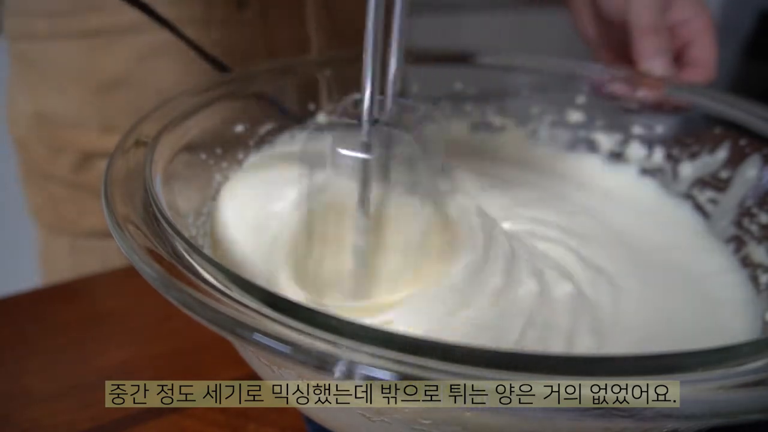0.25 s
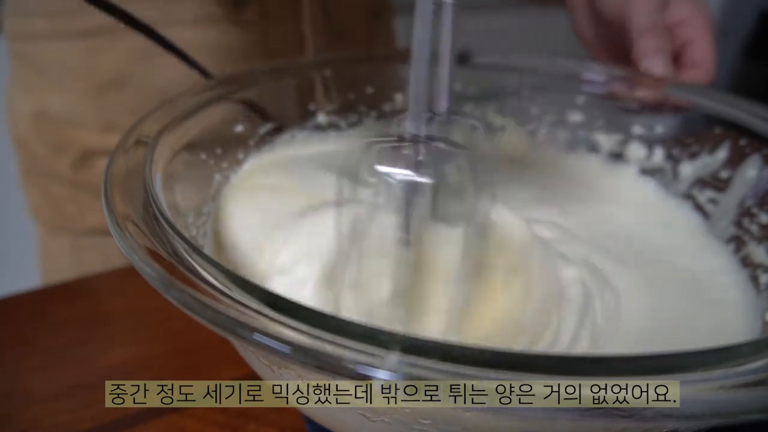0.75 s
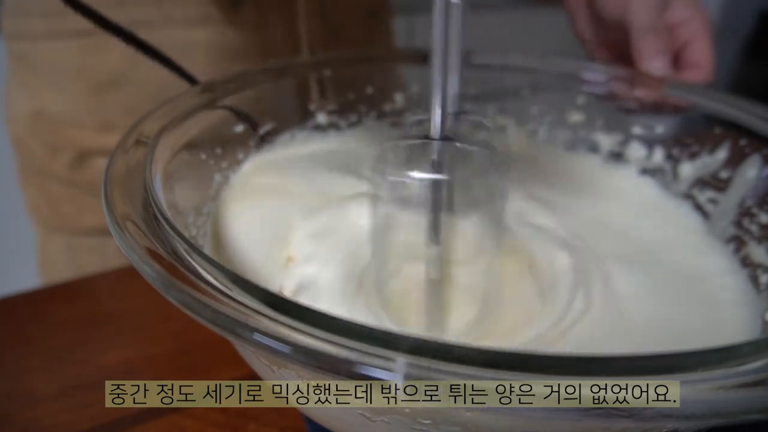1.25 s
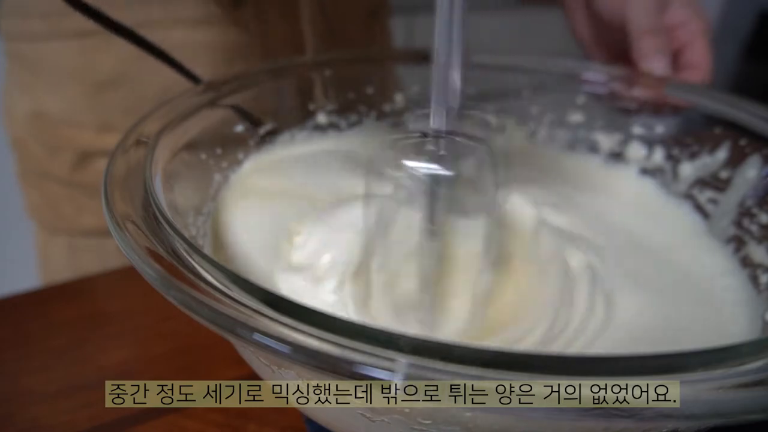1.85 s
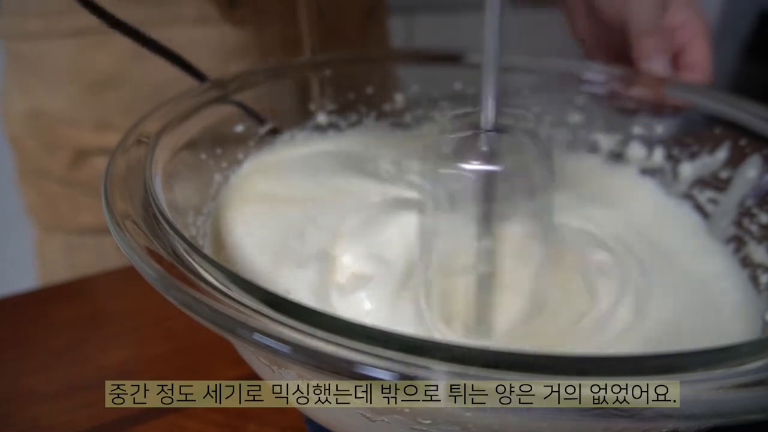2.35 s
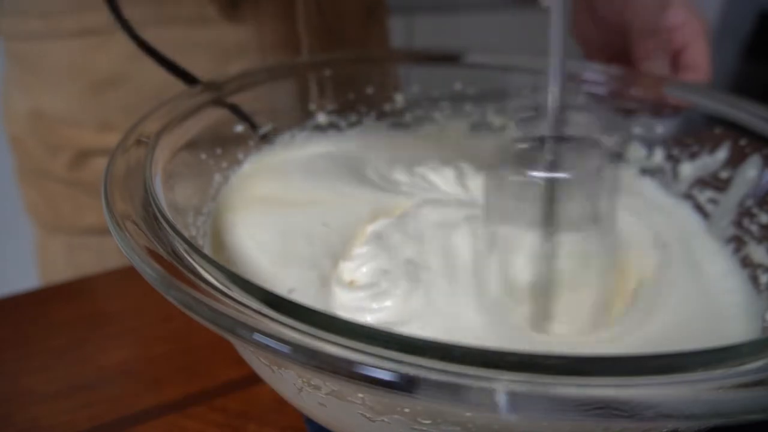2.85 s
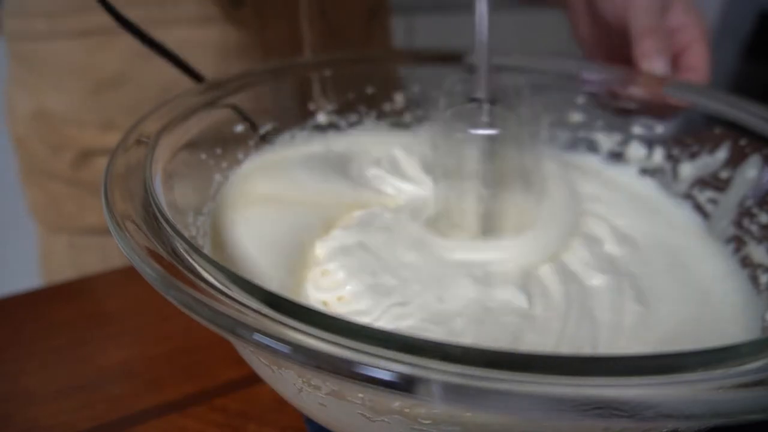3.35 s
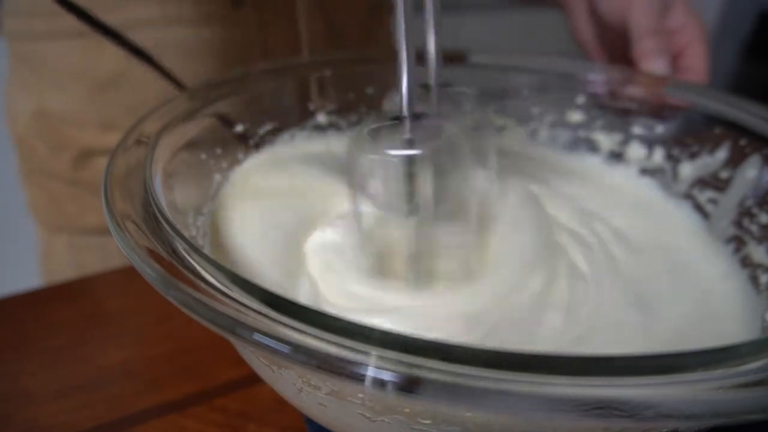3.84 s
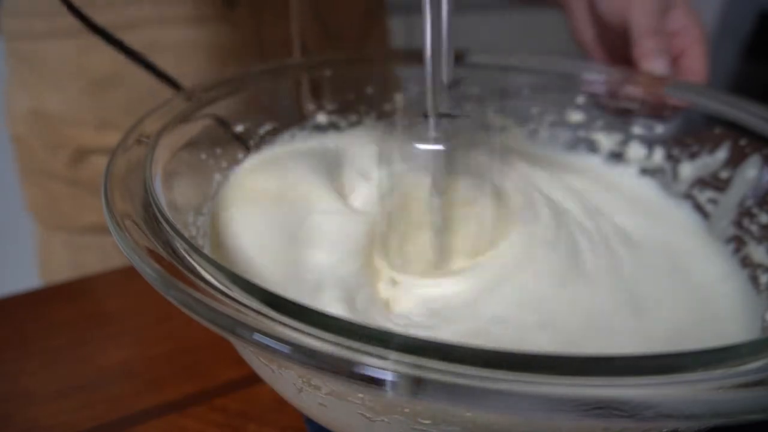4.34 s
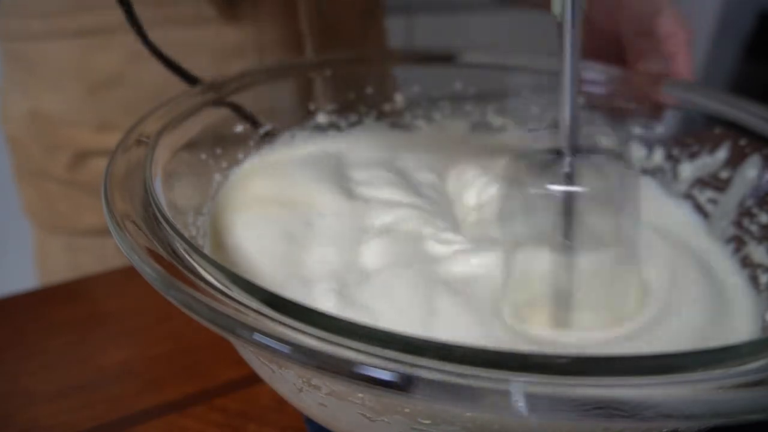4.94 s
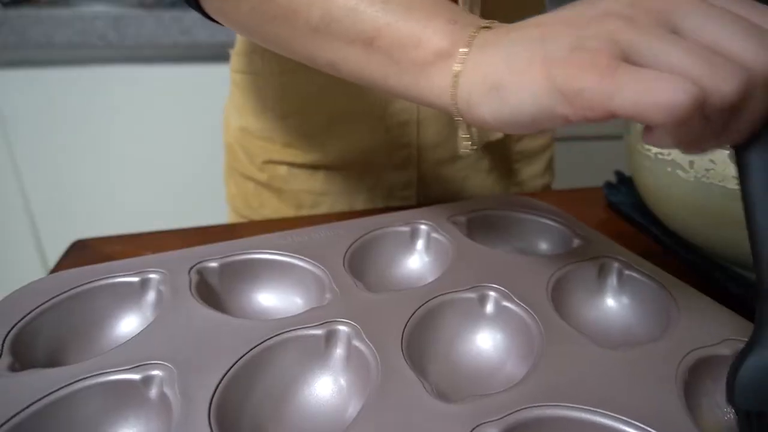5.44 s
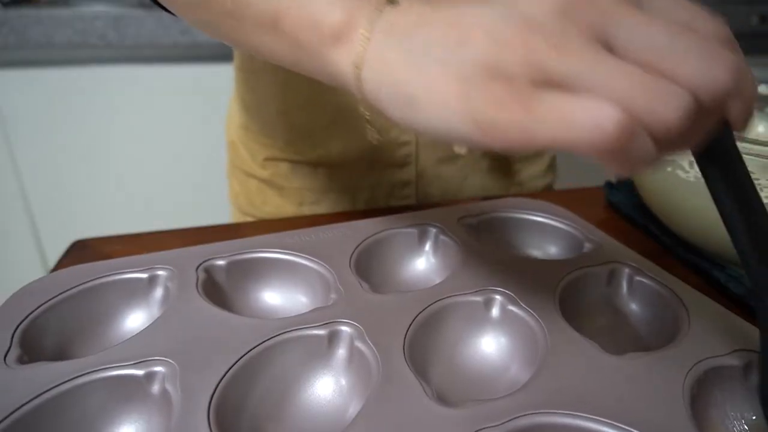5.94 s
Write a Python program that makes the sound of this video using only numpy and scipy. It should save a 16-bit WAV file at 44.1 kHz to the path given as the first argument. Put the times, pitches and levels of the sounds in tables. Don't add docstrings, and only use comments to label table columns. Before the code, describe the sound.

Close microphone on an electric mixer: a constant mid-pitched whine with bright overtones, gear rasp and broad airy hiss, gently wavering and shifting slightly left and right. An abrupt edit switches to a much quieter home kitchen, where a fridge hums low, a ladle rubs a glass bowl in two firm drags and fainter touches, and faint clicks and taps are heard.

```python
import sys
import numpy as np
from scipy import signal
from scipy.fft import rfft, irfft, next_fast_len
from scipy.io import wavfile
from scipy.ndimage import uniform_filter1d

SR = 44100
rng = np.random.default_rng(int(sys.argv[2]) if len(sys.argv) > 2 else 0)


def voltage_ratio(level):
    return 10 ** (np.asarray(level, float) / 20)


def unload_audio(sound):
    columns = np.transpose(np.atleast_2d(sound))
    steps = np.round(np.clip(columns, -1, 1) * 32767)
    wavfile.write(sys.argv[1], SR, steps.astype(np.int16))


N = 272959

CUT_S = 5.2205
MAINS_HZ = 120

# f/Hz, density/dB per Hz
ROOM_COLOUR = [(22, -6), (40, -16), (70, -5.5), (150, -8.5), (300, -10), (600, -16.5), (1000, -27.5),
               (2000, -32), (4000, -37.5), (8000, -41.5), (16000, -48)]
# f/Hz, side over mid/dB
ROOM_SIDE = [(60, -39), (110, -22), (200, -18), (380, -15), (700, -9), (1290, -5.5), (2380, 0), (4400, 0),
             (8120, -1), (15000, -2)]
# f/Hz, width/Hz, level/dB
DRONES = [(27, 10, -59), (153, 10, -54), (237, 12, -56), (297, 12, -58), (400, 40, -59)]
# t/s, peak level/dB, low edge f/Hz, high edge f/Hz, time to fall 60 dB/s
TICKS = [
    (5.3212, -50, 1500, 5000, .01),
    (5.3531, -44, 6200, 8300, .008),
    (5.49, -51, 4000, 13000, .08),
    (5.604, -36.5, 2000, 8500, .004),
    (5.6779, -46, 1500, 6500, .07),
    (5.679, -52, 1680, 1860, .12),
    (5.862, -50, 5000, 15500, .03),
    (5.872, -49, 4000, 10000, .07),
]
# f/Hz, width/Hz, level/dB
BOWL = [(393, 60, 4), (540, 110, 1), (720, 140, -3), (1040, 150, -7), (1330, 160, -4), (1780, 300, -24)]
# start t/s, length/s, level/dB
STROKES = [
    (5.24, 0.067, -55),
    (5.336, 0.13, -43),
    (5.5, 0.027, -54),
    (5.679, .02, -48),
    (5.757, 0.036, -50),
    (5.833, 0.11, -44.5),
]
# t/s, side (positive = left), reach across the bowl, lift out of the batter (all about -1..1)
HAND = [(0.0, -0.12, 0.01, -0.6), (0.23, 0.49, -0.82, -0.15), (0.55, -0.34, 0.44, -1),
        (0.82, 0.12, -0.56, 0.22), (1.09, -0.0073, 0.31, 0.15), (1.35, 0.22, -0.68, 0.29),
        (1.63, -0.053, 0.35, -0.52), (1.88, -0.098, -0.33, 0.03), (2.09, 0.28, 0.19, -1.07),
        (2.27, -1, -0.0094, 0.8), (2.5, 0.4, -0.2, -0.19), (2.93, -0.83, 0.19, 0.6),
        (3.07, 0.48, -0.36, -0.11), (3.38, -0.14, 0.16, -0.55), (3.61, 0.22, -0.36, -1.1),
        (4.13, 0.66, 0.11, 1.0), (4.99, -0.57, 0.28, 0.29), (5.22, -0.089, 0.41, -0.2)]
# f/Hz, side over mid/dB
MIXER_SIDE = [(25, -45), (60, -41), (110, -23), (200, -30), (380, -28.5), (700, -16.5), (1290, -13),
              (2380, -15), (4400, -10.5), (8120, -5.5), (15000, -1)]
# f/Hz, left over right/dB
MIXER_LEAN = [(60, 1), (110, 0.5), (200, 1), (380, -0.8), (700, 0.0), (1290, 0.9), (2380, -3), (4400, -1.8),
              (8120, -1.5), (15000, -1.2)]
# f/Hz, density/dB per Hz
AIR_COLOUR = [(25, -24), (50, -33), (110, -14.5), (190, -8), (300, 0), (600, -2), (1050, -5.5), (1250, -2),
              (2000, -1.5), (2900, -2.5), (4300, -4.5), (7000, -8.5), (10000, -10.5), (13000, -16.5),
              (16000, -17)]
# f/Hz, width/Hz, rise/dB
HOUSING = [(1700, 140, 3.5), (3281, 390, 11.5), (3700, 230, 3.5), (4660, 200, 0), (5480, 170, 7),
           (6300, 490, 4.5), (7370, 390, 5.5)]
# mean level/dB, then change/dB per unit of side, of reach, of lift
VENTS = [
    (-35.5, -0.1, -0.49, -.4),
    (-36, -3.5, -0.35, -.3),
    (-30.5, 1.2, -0.27, 0.2),
    (-33.5, 2, -0.7, -0.3),
]
# t/s, f/Hz
SHAFT = [(0, 411.2), (.2, 411.6), (.45, 411), (.8, 410.7), (1.2, 410.35), (1.5, 410.7), (1.75, 410.3),
         (2.15, 410.2), (2.5, 410.8), (2.85, 410), (3.4, 409.75), (3.87, 410), (4.05, 410.7), (4.4, 410.3),
         (4.62, 409.3), (4.75, 409.6), (4.96, 408.9), (5.1, 409.5)]
# order/multiple, level/dB
ROTOR = [(1, -42), (2, -43), (3, -46), (4, -42), (5, -50), (6, -52), (9, -40), (10, -54), (11, -56),
         (12, -45), (13, -55), (14, -55), (16, -53), (17, -58), (18, -54), (20, -55), (21, -59), (22, -50),
         (23, -54), (24, -43), (25, -57), (27, -62), (28, -59), (30, -51), (31, -63), (32, -54), (35, -61),
         (36, -52), (33, -64), (34, -65)]
# order/multiple of shaft, pulse/multiple of
# MAINS_HZ, level/dB
SIDE_TONES = [(1, -1, -55), (1, 1, -44), (1, 2, -53), (1, 4, -58), (1, 5, -56), (2, -1, -57), (2, 2, -58),
              (3, -2, -59), (3, -1, -51), (3, 1, -56), (3, 2, -57), (4, 1, -48), (5, -1, -57), (5, 1, -54),
              (6, 1, -51), (7, -1, -51), (12, 1, -58), (16, -1, -62), (18, -1, -62), (18, 1, -63),
              (23, 1, -60), (24, -1, -54), (24, 1, -49), (25, -1, -61), (31, -1, -65), (36, -1, -67),
              (36, 1, -61), (37, 0, -63), (38, 0, -63)]
# f/Hz,
# level/dB
SLOW_TONES = [(59.3, -62), (76.7, -60.5), (95.7, -70), (858.6, -60), (1249, -57), (1775, -52), (2821, -54),
              (213, -63), (600, -60), (840, -61), (939, -60), (1211, -59), (1300, -56), (1410, -56),
              (1623, -59), (1680, -57), (1811, -57), (1830, -58), (1908, -57), (2118, -56), (2441, -56)]
# order/multiple of shaft, pulse/multiple of MAINS_HZ
STEERED = ((1, 0), (3, 0), (4, 0), (9, 0), (12, 0), (22, 0), (24, 0), (30, 0), (32, 0), (36, 0), (2, 0),
           (5, 0), (23, 0), (1, 1), (4, 1), (6, 1), (24, 1), (24, -1))
# mean level/dB, then change/dB per unit of side, of reach, of lift
BEAMS = [(-42, 3.9, 1, 1), (-45.5, -1.8, -4.5, -0.3), (-41.5, -1.5, -4, -1), (-38.5, -0.5, 8, -0.5),
         (-45.5, .2, 12.5, -3), (-51, -2, 2, 4), (-43.5, 8, 12.5, -3), (-50, -3, -5, -.4),
         (-58, .1, -5, -2.6), (-54, 6, -.6, 6), (-42.5, 0.4, -.8, -1.6), (-50, -6, 11, 3), (-55, 4, -5, -2),
         (-43.5, 0, -0.5, -2.2), (-50, -11, -7, -3), (-51.5, -3, 13, -3), (-48.5, 2, 3, -2.5),
         (-53, -2.9, -9, 0)]


def along(points, hz):
    f, v = np.transpose(points)
    return np.interp(np.log(hz + 1), np.log(f + 1), v)


def curves(rows):
    s, *cols = np.transpose(rows)
    return [np.interp(np.arange(N) / SR, s, c) for c in cols]


def wobble(rate):
    knots = rng.standard_normal(400)
    coarse = np.interp(np.arange(0, N, 8) * rate / SR, np.arange(len(knots)), knots)
    return np.repeat(coarse, 8)[:N]


def ramp(start_s, rise_s):
    progress = np.clip((np.arange(N) / SR - start_s) / rise_s, 0, 1)
    return np.sin(np.pi / 2 * progress) ** 2


def filtered(x, response):
    m = next_fast_len(N + 8192)
    return irfft(rfft(x, m) * response(np.fft.rfftfreq(m, 1 / SR)), m)[..., :N]


def bell(hz, centre_hz, width_hz):
    return 1 / np.sqrt(1 + (2 * (hz - centre_hz) / width_hz) ** 2)


def rush(gain, side, patchy_db):
    z = signal.stft(rng.standard_normal((2, N)), nperseg=512)[2]
    field = uniform_filter1d(rng.standard_normal(z.shape[1:]), size=6, axis=0)
    field = uniform_filter1d(field, size=16, axis=1)
    pair = signal.istft(z * voltage_ratio(patchy_db * field / field.std()), nperseg=512)[1][:, :N]
    mid, diff = filtered(pair, lambda hz: gain(hz) * np.array([np.ones_like(hz), voltage_ratio(along(side, hz))]))
    return np.array([mid + diff, mid - diff]) / mid.std()


def kitchen():
    hum_cycles = np.cumsum(59.2 + 0.44 * wobble(8)) / SR
    hum = np.sqrt(2) * voltage_ratio(-43.3) * ramp(CUT_S, 0.035) * np.sin(2 * np.pi * hum_cycles)
    drone_gain = lambda hz: sum(voltage_ratio(db) / np.sqrt(w) * bell(hz, c, w) ** 2 for c, w, db in DRONES)
    drones = rush(drone_gain, [(20, -47), (400, -20)], patchy_db=2.0)
    room = rush(lambda hz: voltage_ratio(along(ROOM_COLOUR, hz)), ROOM_SIDE, patchy_db=-0.5)
    return hum + voltage_ratio(-48.5) * drones + voltage_ratio(-45.5) * room


def ticks():
    lean_db = np.array([[-3], [3]]) / 2
    out, t = np.zeros((2, N)), np.arange(SR // 10) / SR
    for s, db, low_hz, high_hz, t60 in TICKS:
        band = signal.butter(2, [low_hz, high_hz], "bandpass", fs=SR, output="sos")
        knock = rng.standard_normal(len(t)) + 4 * (t == 0)
        burst = signal.sosfilt(band, knock * voltage_ratio(-60 * t / t60))
        out[:, round(s * SR):][:, :len(t)] += voltage_ratio(db + lean_db) * burst / abs(burst).max()
    return out


def ladle():
    attack_s, release_s = 0.066, 0.041
    glass = lambda hz: sum(voltage_ratio(db) * bell(hz, c, w) ** 2 for c, w, db in BOWL)
    scrape = rush(glass, ROOM_SIDE, patchy_db=.7) * voltage_ratio(1.2 * wobble(60))
    strokes = 0
    for s, length, db in STROKES:
        push = ramp(s - attack_s / 2, attack_s)
        strokes = strokes + voltage_ratio(db) * push * (1 - ramp(s + length, release_s))
    squeak = rush(lambda hz: bell(hz, 5750, 500) ** 2, ROOM_SIDE, patchy_db=1.5)
    squeak = squeak * voltage_ratio(-67.5) * ramp(6.0, .08)
    ring = rush(lambda hz: bell(hz, 400, 40) ** 2, ROOM_SIDE, patchy_db=.5)
    ring = ring * voltage_ratio(-52) * (1 - ramp(5.36, .08))
    return scrape * strokes + squeak + ring


def hand():
    return uniform_filter1d(np.array(curves(HAND)), size=2500, axis=1, mode="nearest")


def airflow():
    place, t = hand(), np.arange(N) / SR
    low_db, rasp_db, body_db, top_db = [mean_db + np.dot(slopes, place) for mean_db, *slopes in VENTS]
    body_db = body_db + 0.03 * (t - CUT_S / 2)
    top_db = top_db + .6 * wobble(45) + .5 * wobble(32)

    def colour(hz):
        return voltage_ratio(along(AIR_COLOUR, hz) + sum(db * bell(hz, c, w) ** 2 for c, w, db in HOUSING))

    def below(hz, edge_hz):
        return 1 / (1 + (hz / edge_hz) ** 8)

    def band(power_share, patchy_db):
        return rush(lambda hz: colour(hz) * np.sqrt(power_share(hz)), MIXER_SIDE, patchy_db)

    low = band(lambda hz: below(hz, 1550), 0.3)
    rasp = band(lambda hz: below(hz, 2420) * (1 - below(hz, 2020)), 0.7)
    body = band(lambda hz: below(hz, 4340) * (1 - below(hz, 2700)), 0.75)
    top = band(lambda hz: 1 - below(hz, 4450), 0.85)
    beaters_db = .25 * np.sin(2 * np.pi * 19.2 * t)
    pulses_db = .1 * np.sin(2 * np.pi * MAINS_HZ * t)
    throb = voltage_ratio(beaters_db + pulses_db + .3 * wobble(30))
    return throb * (voltage_ratio(low_db) * low + voltage_ratio(rasp_db) * rasp + voltage_ratio(body_db) * body + voltage_ratio(top_db) * top)


def tone(cycles, hz, level, scatter):
    pace = 2.55 + hz / 1800
    wave = np.exp(2j * np.pi * (cycles + rng.random()))
    echoes = (wobble(pace) + 1j * wobble(pace)) * 1.12
    mid = np.sqrt(1 - scatter ** 2) + scatter * echoes
    diff = voltage_ratio(along(MIXER_SIDE, hz)) * (wobble(pace) + 1j * wobble(pace)) * 0.69
    return np.sqrt(2) * level * np.array([((mid + diff) * wave).real, ((mid - diff) * wave).real])


def rotor():
    place, t = hand(), np.arange(N) / SR
    shaft_hz = curves(SHAFT)[0] + 0.15 * wobble(14)
    turns = np.cumsum(shaft_hz) / SR
    out = sum(tone(hz * t, hz, voltage_ratio(db), np.clip(hz / 4000, 0, 1)) for hz, db in SLOW_TONES)
    for order, pulse, db in [(order, 0, db) for order, db in ROTOR] + SIDE_TONES:
        echo_share = 0.033 * order
        if (order, pulse) in STEERED:
            mean_db, *slopes = BEAMS[STEERED.index((order, pulse))]
            db = mean_db + np.dot(slopes, place)
            echo_share = .08 + .011 * order
        cycles = order * turns + pulse * MAINS_HZ * t
        out = out + tone(cycles, order * SHAFT[0][1], voltage_ratio(db - 0.17), np.clip(echo_share, 0, .85))
    return out


def scene():
    ports = np.array([[.5], [-.5]])
    mixer = filtered(rotor() + airflow(), lambda hz: voltage_ratio(along(MIXER_LEAN, hz) * ports))
    high = filtered(mixer, lambda hz: hz ** 2 / (hz ** 2 + 1500 ** 2))
    mixer = mixer + high * (voltage_ratio(2 * hand()[0] * ports) - 1)
    return np.where(np.arange(N) < CUT_S * SR, mixer, kitchen() + ladle() + ticks())


def roll_off(x):
    return signal.sosfilt(signal.butter(12, 16750, fs=SR, output="sos"), x)


def record(dry):
    mix = filtered(dry, lambda hz: hz < 15750)
    return roll_off(mix)


dry = scene()
out = record(dry)
unload_audio(out)
```